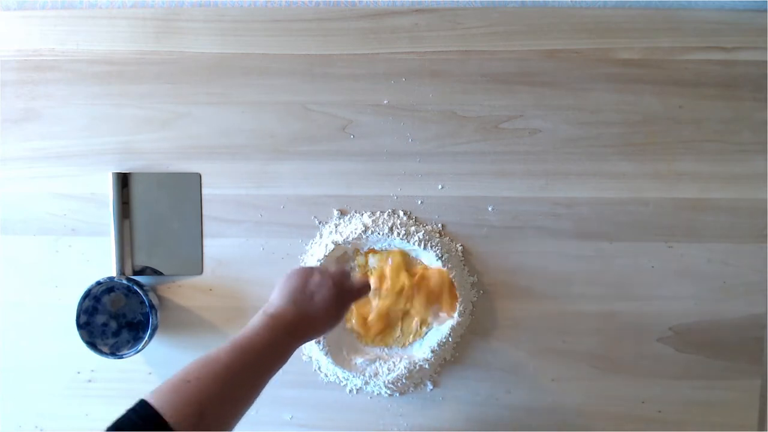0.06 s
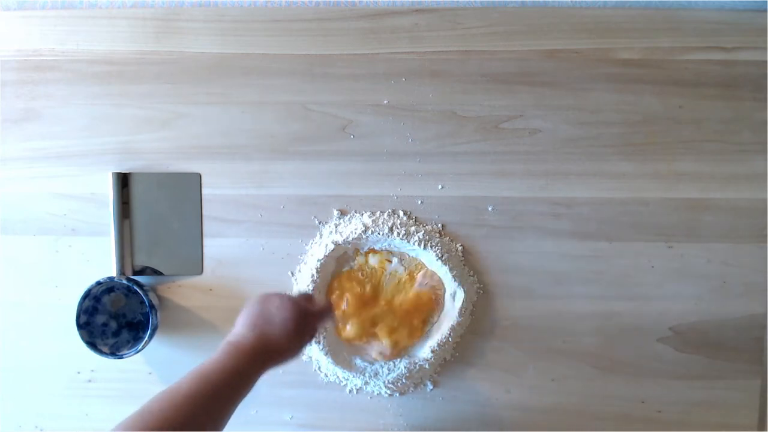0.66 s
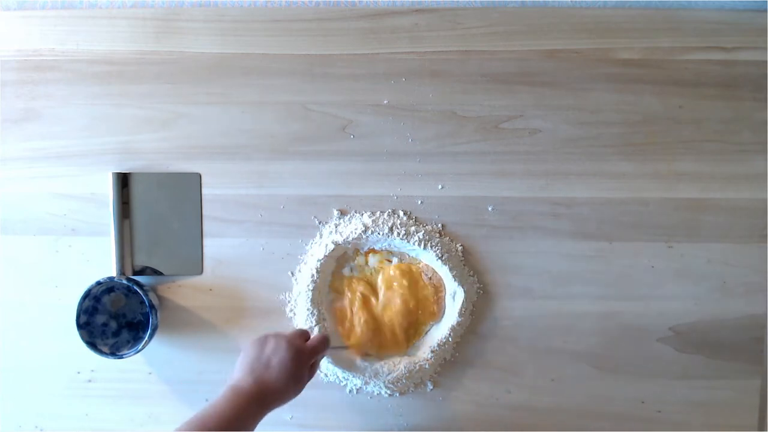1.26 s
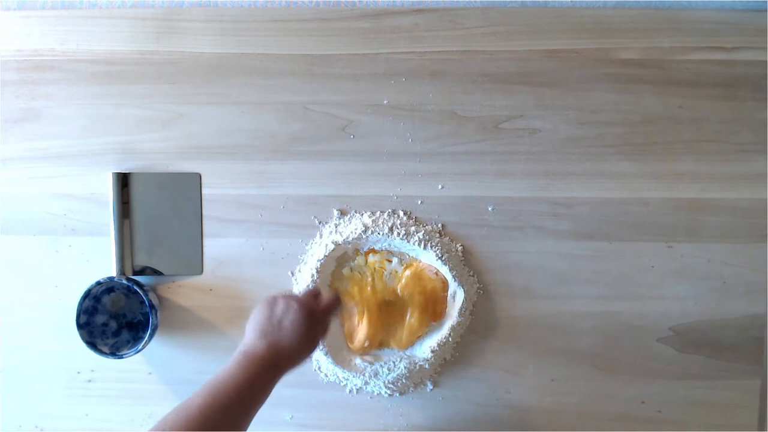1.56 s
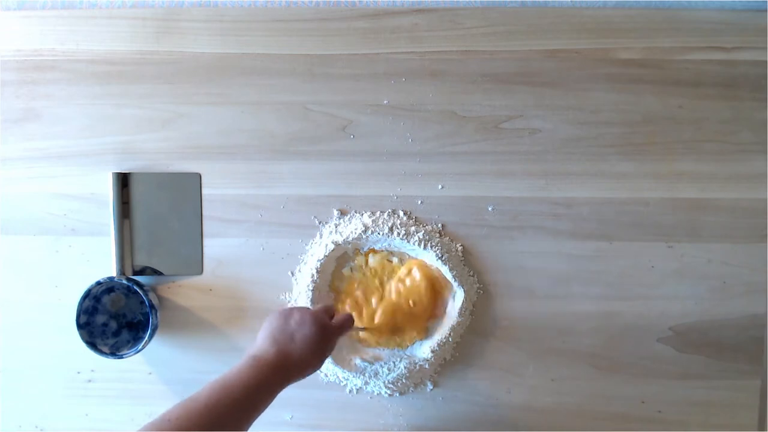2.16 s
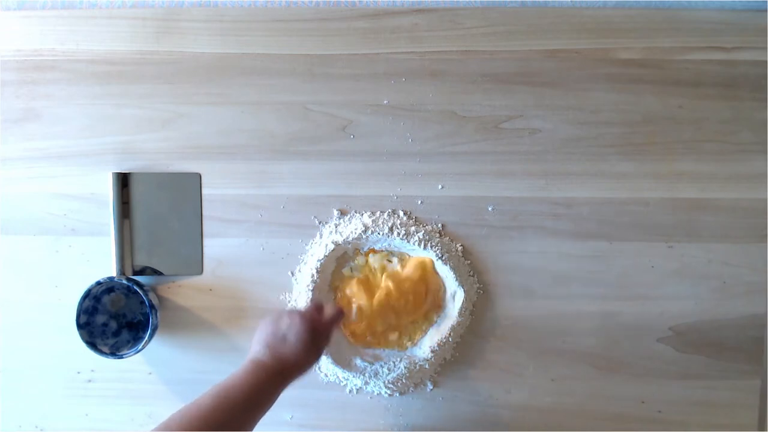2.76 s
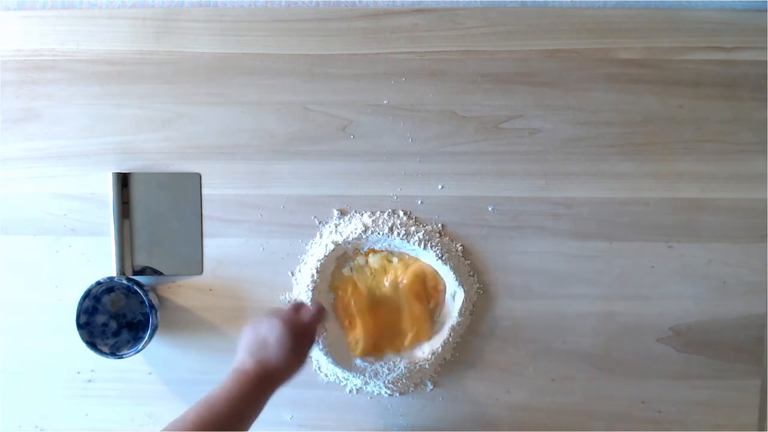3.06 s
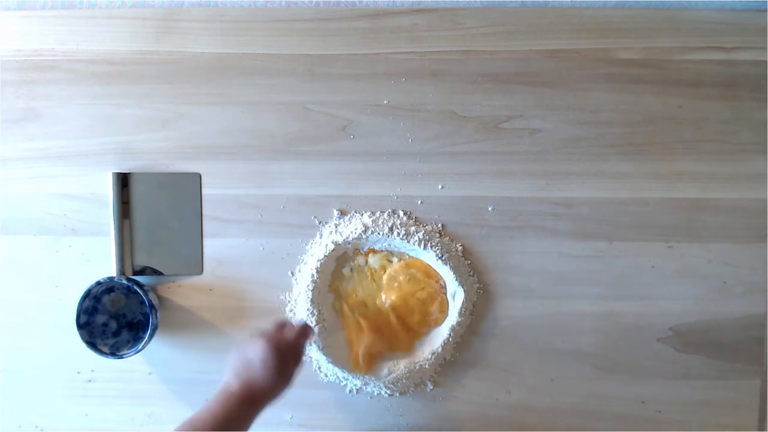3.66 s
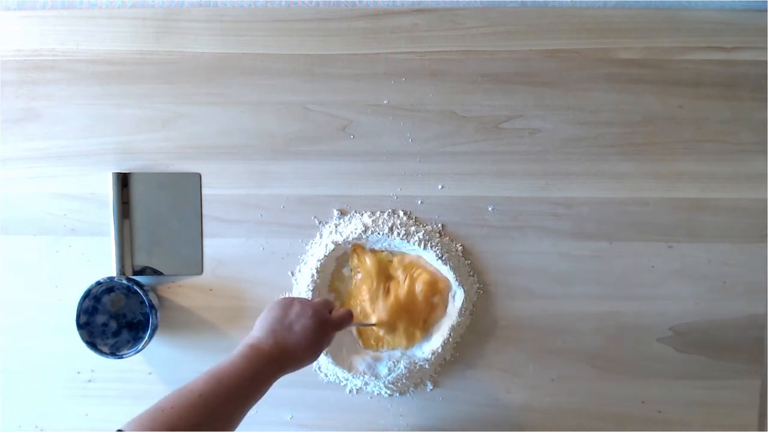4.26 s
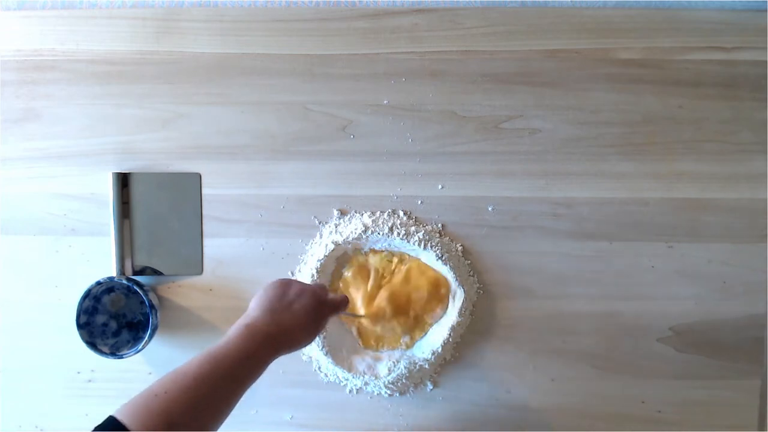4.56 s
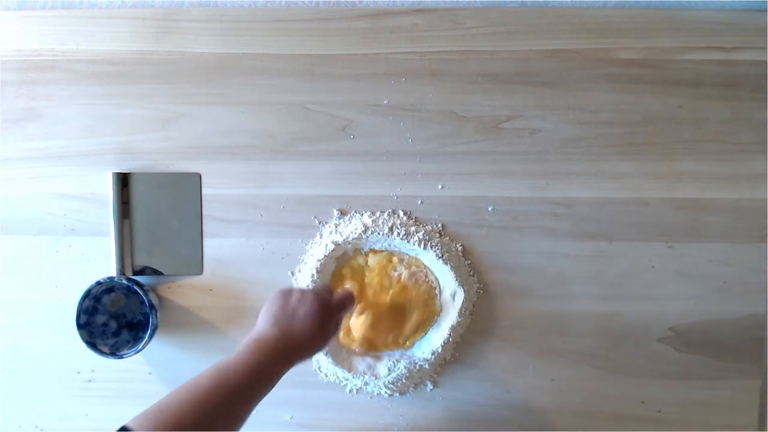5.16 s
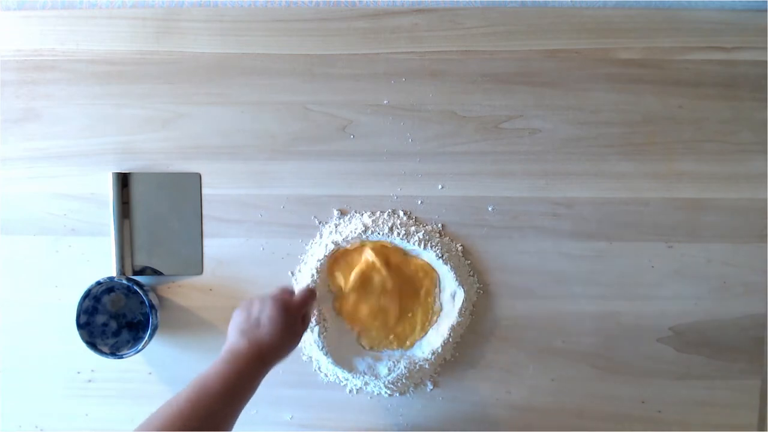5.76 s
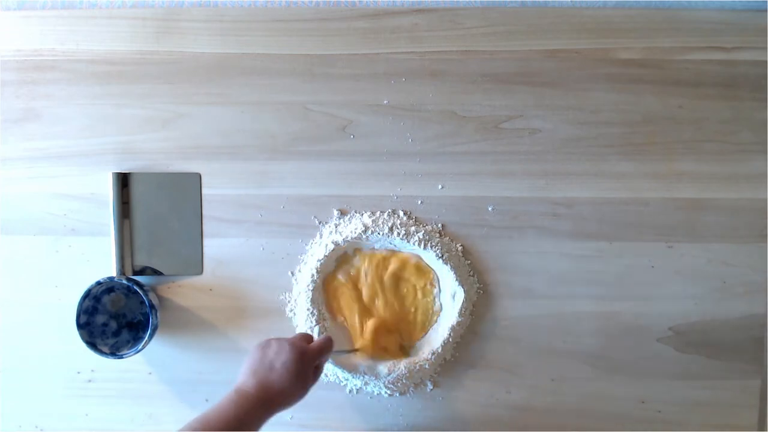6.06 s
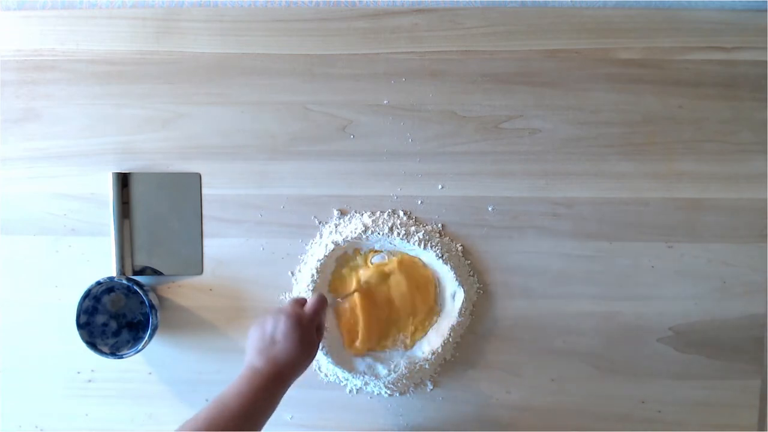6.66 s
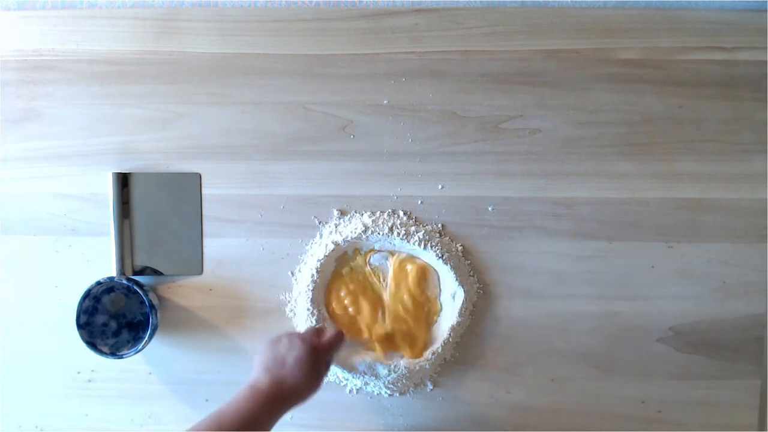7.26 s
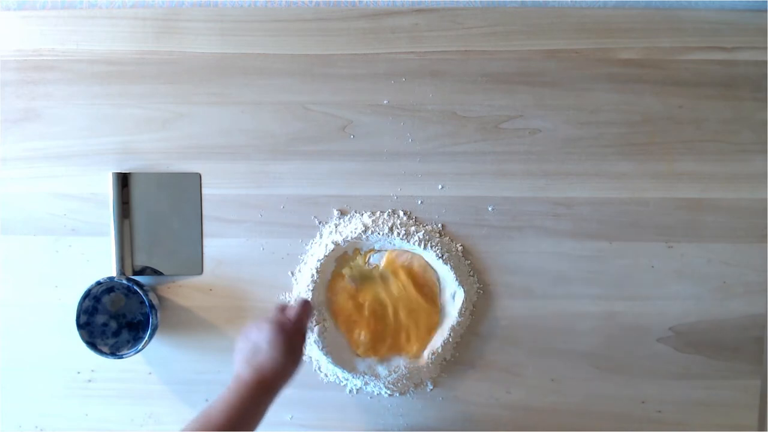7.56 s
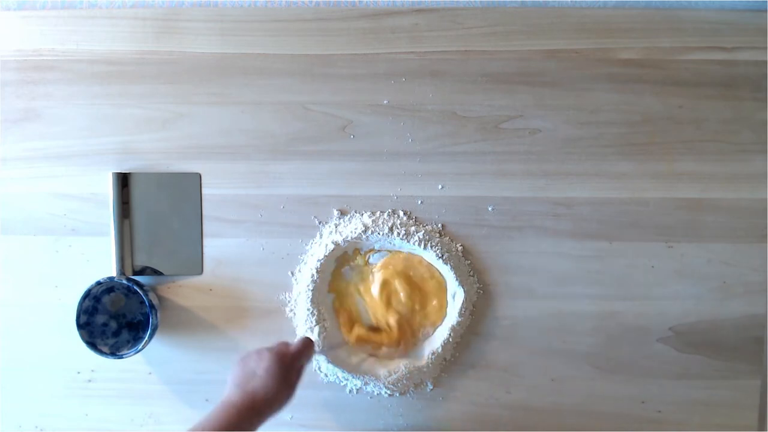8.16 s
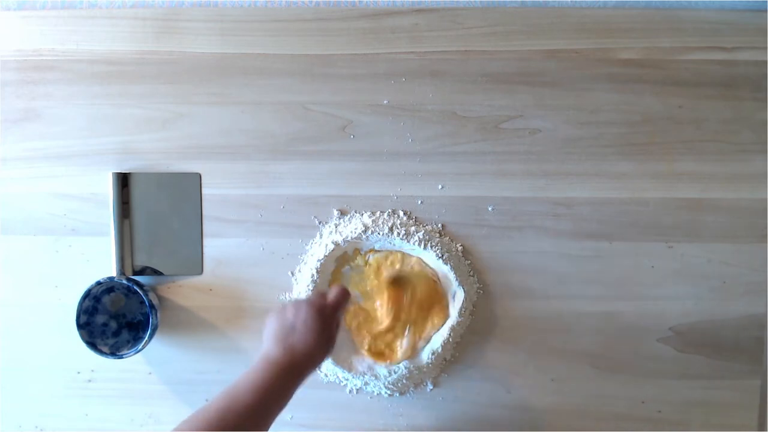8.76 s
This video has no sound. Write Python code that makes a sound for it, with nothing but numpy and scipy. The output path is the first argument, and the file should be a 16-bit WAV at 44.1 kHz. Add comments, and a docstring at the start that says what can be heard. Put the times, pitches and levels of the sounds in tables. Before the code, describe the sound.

A fork beats raw eggs in flour on a wooden board, with quick wet squelches, pops and uneven knocks in an echoing kitchen.

```python
"""A fork beats raw eggs in a well of flour on a wooden board, about four and a half turns a second.
On many turns the tines knock and ring the wood; then they drag through flour and the egg squelches.
Air pockets pop, sticky strands snap, egg squirts between the tines and wet tines briefly squeak.
A bare kitchen echoes it all over faint room air, mains hum and an appliance's whirr."""
import sys
import numpy as np
from scipy import signal
from scipy.fft import rfft, irfft
from scipy.io import wavfile

SR = 44100
rng = np.random.default_rng(int(sys.argv[2]) if len(sys.argv) > 2 else 0)


def materialize(psi):
    """Save the field psi as 16-bit PCM at rate SR to the path in sys.argv[1].

    A 1-D psi becomes a single channel; in a 2-D psi each row is a channel.
    """
    bounded = np.clip(np.atleast_2d(psi).T, -1, 1)
    quanta = np.round(bounded * 32767).astype(np.int16)
    wavfile.write(sys.argv[1], SR, quanta)


N = 392931


def from_db(db):
    """Decibels to gain."""
    return 10 ** (np.asarray(db) / 20)


def rms_one(x):
    """Scale to rms 1."""
    return x / np.sqrt(np.mean(x ** 2) + 1e-20)


def seconds(length_s):
    """Time axis."""
    return np.arange(int(length_s * SR)) / SR


def add(out, start_s, sound):
    """Mix a sound in at start_s."""
    start = max(int(start_s * SR), 0)
    out[start:start + len(sound)] += sound[:max(len(out) - start, 0)]


def at_hz(table, hz, column=1):
    """Interpolate a table column over log frequency."""
    table = np.array(table)
    return np.interp(np.log(np.maximum(hz, 1)), np.log(table[:, 0]), table[:, column])


def butterworth(x, order, cutoff_hz, kind="low"):
    """Causal Butterworth filter."""
    return signal.sosfilt(signal.butter(order, cutoff_hz, kind, fs=SR, output="sos"), x)


def resonate(x, hz, half_width):
    """Double band-pass; half_width is a share of hz; rms 1."""
    edges_hz = [hz / (1 + half_width), hz * (1 + half_width)]
    once = butterworth(x, 1, edges_hz, "band")
    return rms_one(butterworth(once, 1, edges_hz, "band"))


def colour(x, spectrum, size=4096):
    """Minimum-phase filter of unit energy with the given spectral shape."""
    gains = from_db(at_hz(spectrum, np.linspace(0, SR / 2, size // 2 + 1)))
    cepstrum = irfft(np.log(gains))
    cepstrum[1:size // 2] *= 2
    cepstrum[size // 2 + 1:] = 0
    response = irfft(np.exp(rfft(cepstrum)))
    return signal.fftconvolve(x, response / np.linalg.norm(response))[:len(x)]


def even_noise(samples, block=256):
    """Noise with a flat spectrum in every block; rms 1."""
    phases = rng.random((samples // block + 1, block // 2 + 1))
    return rms_one(irfft(np.exp(2j * np.pi * phases)).ravel()[:samples])


def wander(rate_hz, samples):
    """Random control in -1..1, gliding to new values at rate_hz."""
    return np.interp(np.arange(samples) / SR * rate_hz, np.arange(4000), rng.uniform(-1, 1, 4000))


def grains(per_s, spread_db, clump_db, clump_hz):
    """Clumped random clicks of uneven size; rms 1."""
    sizes = from_db(spread_db * np.minimum(rng.exponential(1, N), 4))
    signs = rng.choice([-1, 1], N)
    clumps = from_db(clump_db * wander(clump_hz, N))
    return rms_one(sizes * signs * clumps * (rng.random(N) < per_s / SR))


def tick_run(length_s, tick_s=0.00035, fade_db=11.5, count=5):
    """Unevenly spaced dry ticks, the late ones weaker; rms 1."""
    t = seconds(.06)
    lateness = np.linspace(0, 1, count) * rng.uniform(.7, 1.3, count)
    age_s = t - length_s * lateness[:, None]
    decays = np.exp(-np.abs(age_s) / tick_s) * (age_s >= 0)
    envelope = from_db(-fade_db * lateness) @ decays
    return rms_one(even_noise(len(t)) * envelope)


def bubble(hz, t60_s, rise):
    """An air pocket rings and decays, climbing in pitch as it opens."""
    t = seconds(2 * t60_s)
    phase = 2 * np.pi * hz * (t + rise * t * t / (2 * t60_s))
    onset = 1 - np.exp(-2 * hz * t)
    return np.sin(phase) * from_db(-60 * t / t60_s) * onset


# Room air: freq_hz, gain_db
AIR_SPECTRUM = [(25, -18), (60, 3.5), (115, 7.5), (320, -1), (650, 1), (1100, 4.5), (1750, 6), (2850, -1.5),
                (3500, -4), (5700, -20), (7700, -28), (11000, -26), (16000, -32.5)]
# Appliance noise bands: centre_hz, half_width_ratio, level_db
WHIRR_BANDS = [(2700, .02, -55), (2923, 0.026, -56.5), (6590, 0.064, -71.5)]


def background(air_db=-46.5, hum_hz=125.5, hum_db=-75):
    """Steady room air, an appliance's thin whirr and mains hum."""
    air = from_db(air_db) * colour(rng.standard_normal(N), AIR_SPECTRUM)
    whirr = sum(from_db(db) * resonate(rng.standard_normal(N), hz, half_width)
                for hz, half_width, db in WHIRR_BANDS)
    hum = from_db(hum_db) * np.sin(2 * np.pi * hum_hz * np.arange(N) / SR)
    return air + whirr + hum


# Kitchen reverberation: freq_hz, t60_s, level_db
REVERB_BANDS = [(100, 0.78, -9), (297, 0.22, 0), (820, 0.63, -4), (1750, 0.44, 3), (3950, 0.49, -6),
                (12400, 0.19, -2.5)]


def wall_echoes(delay_s=0.0032, build_s=0.0004):
    """Dense wall echoes build quickly; each octave decays at its own rate."""
    t, response = seconds(.7), 0
    onset = 1 - np.exp(-np.maximum(t - delay_s, 0) / build_s)
    for hz in 62.5 * 2.0 ** np.arange(9):
        edges_hz = [hz / np.sqrt(2), min(hz * np.sqrt(2), SR / 2 - 1000)]
        band = butterworth(even_noise(len(t)), 2, edges_hz, "band")
        fade = from_db(-60 * t / at_hz(REVERB_BANDS, hz)) * onset
        gain = from_db(at_hz(REVERB_BANDS, hz, column=2))
        response = response + gain * band * fade / np.linalg.norm(fade)
    return response


# Ceiling and nearest walls: delay_s, level_db
REFLECTIONS = [(.0038, -3.5), (.0094, -15), (0.0149, -9.5)]


def first_echoes(path_spread=.05, highpass_hz=1500):
    """Distinct treble reflections; their paths vary with the fork's position."""
    response = np.zeros(SR // 20)
    for delay_s, db in REFLECTIONS:
        add(response, delay_s * np.exp(path_spread * rng.standard_normal()), from_db([db]))
    return butterworth(response, 1, highpass_hz, "high")


def kitchen(x, reverb_db=-2.0, spots=3):
    """Turn by turn the fork cycles through a few spots, each with its own echoes."""
    starts_s = [row[0] for row in FORK_TURNS]
    spot = np.searchsorted(starts_s, np.arange(N) / SR) % spots
    out = np.zeros(N)
    for k in range(spots):
        response = from_db(reverb_db) * wall_echoes()
        add(response, 0, first_echoes())
        out += signal.oaconvolve(x * (spot == k), response)[:N]
    return out


def direct_path(x, shadow_hz=1800, treble_db=-6.5):
    """The microphone faces away from the board, so the direct sound loses treble."""
    low = butterworth(x, 1, shadow_hz)
    return low + from_db(treble_db) * (x - low)


# Wet tines on wood: start_s, level_db, first_pitch_hz, last_pitch_hz, length_s
TINE_SQUEAKS = [(7.894, -38, 4600, 5200, 0.023), (7.904, -36, 4040, 4350, 0.011),
                (7.913, -39, 1746, 1917, 0.045)]


def squeaks(gain_db=-1.0, waver=0.035, waver_hz=500, flutter_db=9.0):
    """Fast stick-slip of a tine sings a short, unsteady note."""
    out = np.zeros(N)
    for start_s, db, first_hz, last_hz, length_s in TINE_SQUEAKS:
        size = int(length_s * SR)
        hz = np.linspace(first_hz, last_hz, size) * (1 + waver * wander(waver_hz, size))
        swell = signal.windows.tukey(size) * from_db(db + gain_db + flutter_db * wander(waver_hz, size))
        add(out, start_s, swell * np.sin(2 * np.pi * np.cumsum(hz) / SR))
    return out


# Egg forced between tines: start_s, level_db, pitch_hz, length_s
EGG_SQUIRTS = [(0.476, -47, 3960, .008), (2.827, -31, 4000, .006), (3.026, -35, 5600, 0.0044),
               (3.07, -41, 3720, 0.016), (3.898, -42.5, 5940, 0.011), (4.222, -40, 1290, 0.033),
               (4.229, -33.5, 2520, 0.028), (6.145, -38, 5500, 0.0038), (6.147, -40.5, 2750, 0.023),
               (6.338, -43, 6740, 0.006), (6.468, -26.5, 3000, 0.012), (6.962, -38.5, 2700, 0.034),
               (7.288, -45, 5670, 0.018), (7.877, -37.5, 4240, 0.055), (8.108, -54, 4650, 0.036)]


def squirts(half_width=0.14):
    """A short fizz resonates in a narrow gap."""
    out = np.zeros(N)
    for start_s, db, hz, length_s in EGG_SQUIRTS:
        noise = rng.standard_normal(SR // 4)[:int(length_s * SR)]
        fizz = resonate(noise ** 3, hz, half_width)
        add(out, start_s, from_db(db) * fizz * signal.windows.tukey(len(fizz)))
    return out


# Thick strands parting: start_s, smack_db, spray_db, length_s
STRAND_SNAPS = [(0.567, -42, -53, 0.0033), (0.653, -53, -46, 0.0042), (.898, -42, -52, .003),
                (1.307, -44, -58, 0.0017), (1.62, -38.5, -52, 0.0062), (1.7467, -29.5, -28, 0.00031),
                (2.7213, -34, -41.5, 0.0078), (2.8225, -50, -37, 0.0082), (3.028, -31.5, -48, 0.0043),
                (3.149, -36, -44, 0.0035), (3.259, -35.5, -42, 0.0072), (3.7297, -29, -44, 0.00086),
                (5.928, -51, -47.5, 0.0024), (6.2043, -49, -37, 0.00044), (6.269, -48, -46, .004),
                (6.437, -38, -45, 0.0025), (6.4725, -32, -40.5, 0.0083), (6.589, -27.5, -38, 0.0034),
                (7.0585, -31, -31.5, .008), (7.285, -34, -42, 0.0043), (7.419, -36, -54, 0.0074),
                (7.543, -30.5, -41, 0.014), (7.587, -33, -50, .003), (8.364, -41, -64, 0.0019),
                (8.493, -37, -54.5, 0.0013), (8.523, -39, -60, 0.0037)]
# Wet smack: freq_hz, gain_db
SMACK_SPECTRUM = [(900, -26), (2000, 15), (3000, 12.5), (5100, 2.5), (6400, -4), (8000, -32), (16000, -54)]
# Fine spray: freq_hz, gain_db
SPRAY_SPECTRUM = [(3500, -9), (6500, 9.5), (11000, 15), (15500, 10.5)]


def snaps(smack_gain_db=-9.0, spray_gain_db=-15.0, landing_s=.003):
    """Egg smacks in a tight run of ticks when a strand parts or the tines land."""
    smack, spray = np.zeros(N), np.zeros(N)
    # a landing's smack and spray scale with its knock
    landings = [(start_s, knock_db - 21, knock_db - 36, landing_s)
                for start_s, knock_db, *_ in FORK_TURNS]
    for start_s, smack_db, spray_db, length_s in landings + list(STRAND_SNAPS):
        ticks = tick_run(length_s)
        add(smack, start_s, from_db(smack_db + smack_gain_db) * ticks)
        add(spray, start_s, from_db(spray_db + spray_gain_db) * ticks)
    return colour(smack, SMACK_SPECTRUM) + colour(spray, SPRAY_SPECTRUM)


def threads(envelope, gain_db=-23.5, lag_s=0.057):
    """Fine egg threads tick as they break behind the fork."""
    lagged = np.interp(np.arange(N) - lag_s * SR, np.arange(N), envelope)
    ticks = grains(per_s=55, spread_db=3.5, clump_db=4, clump_hz=30)
    return from_db(gain_db) * colour(lagged * ticks, SMACK_SPECTRUM)


# Air pockets opening, plus one egg squirt at 3.729 s that rings high and briefly: start_s, level_db, pitch_hz
AIR_POCKETS = [(0.213, -28, 1075), (.697, -23.5, 1290), (1.077, -24.5, 1950), (1.747, -20.5, 1700),
               (2.406, -24, 3180), (2.55, -34, 176), (2.8275, -27.5, 590), (2.847, -24, 820),
               (3.476, -25.5, 1470), (3.7292, -28, 1220), (3.7294, -17, 5100), (6.358, -26.5, 1660),
               (6.3745, -26.5, 1145), (6.589, -28, 524), (7.05, -21.5, 2220), (7.0498, -25.5, 860),
               (7.208, -28, 1150), (7.286, -19, 688), (8.415, -30, 2500)]


def pops(ring_gain_db=8.5, t60_cycles=18.6, burst_gain_db=-4.0, burst_s=0.006):
    """A film splutters and the pocket behind it rings; large, low ones last longest."""
    rings, bursts, t = np.zeros(N), np.zeros(N), seconds(.03)
    for start_s, db, hz in AIR_POCKETS:
        add(rings, start_s, from_db(db) * bubble(hz, t60_cycles / hz, rise=0.05))
        add(bursts, start_s, from_db(db) * rng.standard_normal(len(t)) * np.exp(-t / burst_s))
    return from_db(ring_gain_db) * rings + from_db(burst_gain_db) * colour(bursts, SQUELCH_SPECTRUM)


# Churned egg: freq_hz, gain_db
SQUELCH_SPECTRUM = [(200, -10.5), (600, 4.5), (1100, 9.5), (2700, -1), (3600, -5), (5500, -19),
                    (7800, -29.5), (11000, -30.5), (16000, -52)]


def squelching(envelope, crackle_gain_db=-6.5, froth_gain_db=10.0, bubbles=1100):
    """Tearing films crackle and small bubbles ring as air is folded into the egg."""
    films = grains(per_s=1600, spread_db=1, clump_db=8, clump_hz=90)
    crackle = colour(envelope * films, SQUELCH_SPECTRUM)
    froth = np.zeros(N)
    for when, smallness, weakness in rng.random((bubbles, 3)):
        hz = 520 * 11 ** smallness
        gain = envelope[int(when * N)] * from_db(at_hz(SQUELCH_SPECTRUM, hz) * 0.42 - 10.8 * weakness)
        add(froth, when * N / SR, gain * bubble(hz, t60_s=20 / hz, rise=0.15))
    return from_db(crackle_gain_db) * crackle + from_db(froth_gain_db) * froth


# Tines rubbing through flour: freq_hz, gain_db
DRAG_SPECTRUM = [(40, -42), (110, 0), (210, -4), (310, 8), (450, 0.5), (700, -5.5), (1100, -7), (1800, -8),
                 (3500, -43.5), (8000, -87)]


def dragging(envelope, gain_db=-2.5, flutter_db=5, flutter_hz=100):
    """Tines stick and slip over floury wood in a dense rub."""
    slips = even_noise(N) * from_db(flutter_db * wander(flutter_hz, N))
    return from_db(gain_db) * colour(envelope * slips, DRAG_SPECTRUM)


# Liquid egg (+) or dry flour (-) at the fork: time_s, squelch_over_drag_db
WETNESS_CURVE = [(0, 2.5), (2.9, -0.5), (3.25, 3.5), (4.05, -2), (4.25, 10), (4.5, -6.5), (6.3, 2), (7, 9),
                 (7.23, 3), (7.47, 14), (7.7, 4), (8.9, 1)]


def sweep_envelopes(landing_speed=0.4, cross_turns=0.038, lift_turns=0.57):
    """Drag and squelch follow the fork as it speeds up, crosses the well and lifts out."""
    t = np.arange(N) / SR
    starts_s, _, sweep_db, speed_up_s = np.transpose(FORK_TURNS)
    lengths_s = np.append(np.diff(starts_s), starts_s[-1] - starts_s[-2])
    turn = np.maximum(np.searchsorted(starts_s, t) - 1, 0)
    since_peak_s = t - starts_s[turn] - speed_up_s[turn]
    rise = np.interp(since_peak_s / speed_up_s[turn], [-1, 0], [landing_speed, 1])
    fall = np.interp(since_peak_s / lengths_s[turn], [cross_turns, cross_turns + lift_turns], [1, 0])
    envelope = from_db(sweep_db[turn]) * (rise * fall) ** 2
    wetness_db = np.interp(t, *np.transpose(WETNESS_CURVE))
    return envelope * from_db(-wetness_db / 2), envelope * from_db(wetness_db / 2)


def disperse(x, centre_hz=700, width_hz=700):
    """Bending waves disperse in wood: an allpass smears the attack."""
    radius = np.exp(-np.pi * width_hz / SR)
    denominator = [1, -2 * radius * np.cos(2 * np.pi * centre_hz / SR), radius * radius]
    return signal.lfilter(denominator[::-1], denominator, x)


def cushion(blow, knock_db, soft_hz=750, soft_db=-24.5, hz_per_db=67):
    """Dough lengthens and dulls soft contacts; hard ones press through and sound brighter."""
    cutoff_hz = soft_hz + hz_per_db * max(knock_db - soft_db, 0)
    return butterworth(blow, 2, min(cutoff_hz, SR / 4))


# Board and table modes: pitch_hz, level_db, t60_s
BOARD_MODES = [(120.5, 2, 0.085), (294, -5, 0.15), (324, -3.5, 0.16), (382.5, -1.5, 0.16),
               (523, -16, 0.071), (660, 3, 0.098), (779, 4, 0.014), (928, 3.5, 0.062), (985, -3, 0.088),
               (1186, -17, 0.068), (1410, 10, 0.0099), (2000, 19, 0.028), (2730, 6, 0.054)]
# Tines rattling on wood: freq_hz, gain_db
RATTLE_SPECTRUM = [(120, -35.5), (450, -5), (1500, 2), (3000, -10), (8000, -63)]
# Turns, each starting as the tines land: start_s, knock_db, sweep_db, speed_up_s
FORK_TURNS = [(-0.08, -74, -25, 0.029), (0.078, -32, -35, 0.054), (0.34, -56, -41, 0.058),
              (0.57, -58, -34.5, 0.06), (0.7794, -16, -35, 0.077), (0.9827, -33.5, -35.5, 0.039),
              (1.2037, -30, -40, 0.057), (1.415, -23.5, -31.5, 0.075), (1.6238, -24.5, -36.5, 0.052),
              (1.859, -38.5, -33.5, 0.048), (2.071, -53, -32.5, 0.061), (2.279, -42, -38, 0.046),
              (2.505, -32.5, -36.5, 0.045), (2.728, -26, -31.5, 0.043), (2.941, -26.5, -36, 0.057),
              (3.155, -18, -35, 0.068), (3.357, -14.5, -32, 0.04), (3.5554, -25.5, -35, 0.036),
              (3.762, -13.5, -32.5, 0.056), (3.9708, -23, -36, 0.075), (4.172, -57, -37, 0.056),
              (4.453, -34.5, -48, 0.091), (4.74, -54, -47.5, 0.063), (4.989, -59, -45.5, 0.08),
              (5.2402, -43.5, -43.5, 0.069), (5.4977, -35.5, -40, 0.056), (5.7535, -40.5, -39.5, 0.053),
              (6.01, -42.5, -40, 0.054), (6.271, -39, -35, 0.052), (6.4724, -16.5, -36, 0.074),
              (6.706, -30, -36.5, 0.06), (6.937, -55, -34.5, 0.054), (7.17, -52, -32.5, 0.041),
              (7.407, -50, -35.5, 0.072), (7.6393, -19.5, -27.5, 0.038), (7.8665, -27, -27, 0.024),
              (8.0781, -21, -31.5, 0.028), (8.2996, -21.5, -39, 0.048), (8.551, -25.5, -40, 0.022),
              (8.814, -32, -44, 0.056)]
# Board contacts later in a turn: start_s, knock_db
LATE_TOUCHES = [(1.13, -35.5), (3.698, -39.5), (6.589, -33)]


def knocks(gain_db=0.5, detune=.05, scatter_db=2.0, echo_s=0.003876, rattle_db=3.5, rattle_s=0.0032):
    """Tines strike a new spot each time, ring the board's modes and rattle briefly."""
    out, t = np.zeros(N), seconds(.25)
    attack = slice(SR // 100)
    mode_hz, mode_db, t60_s = np.transpose(BOARD_MODES)
    decays = from_db(-60 * t / t60_s[:, None])
    for start_s, knock_db, *_ in list(FORK_TURNS) + list(LATE_TOUCHES):
        # fork and dough load the board differently on each knock
        pitch_hz = mode_hz * np.exp(detune * rng.standard_normal(len(mode_hz)))
        modes = np.sin(2 * np.pi * pitch_hz[:, None] * t) * decays
        ring = from_db(mode_db + scatter_db * rng.standard_normal(len(mode_hz))) @ modes
        # a quick inverted echo, about 4 ms later, thickens each knock
        add(ring, echo_s * np.exp(0.2 * rng.standard_normal()), -ring)
        rattle = colour(even_noise(len(t)) * np.exp(-t / rattle_s), RATTLE_SPECTRUM)
        blow = ring / np.std(ring[attack]) + from_db(rattle_db) * rattle / np.std(rattle[attack])
        blow = cushion(blow, knock_db)
        add(out, start_s, from_db(knock_db + gain_db) * blow / np.std(blow[attack]))
    # the board is too small to radiate deep bass
    return butterworth(disperse(out), 2, cutoff_hz=165, kind="high")


def scene():
    """Fork, egg and board, heard from above in the kitchen; mono."""
    drag_envelope, egg_envelope = sweep_envelopes()
    egg = squelching(egg_envelope) + threads(egg_envelope) + pops() + snaps() + squirts()
    beating = knocks() + dragging(drag_envelope) + squeaks() + egg
    return (direct_path(beating) + kitchen(beating) + background())[None]


def record(dry):
    """Steep low-pass at 16 kHz."""
    return signal.sosfilt(signal.ellip(10, .1, 70, 16000, fs=SR, output="sos"), dry)


dry = scene()
out = record(dry)
materialize(out)
```